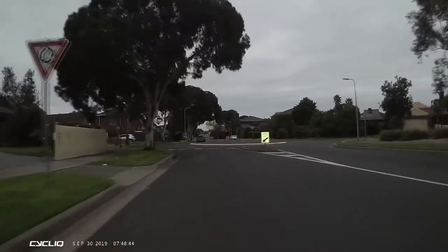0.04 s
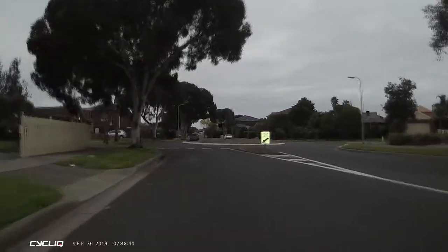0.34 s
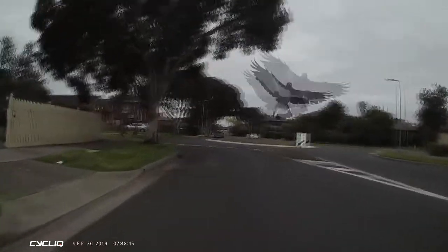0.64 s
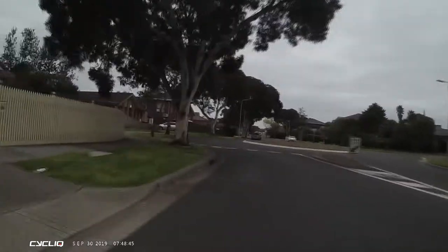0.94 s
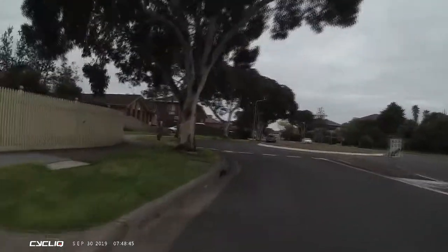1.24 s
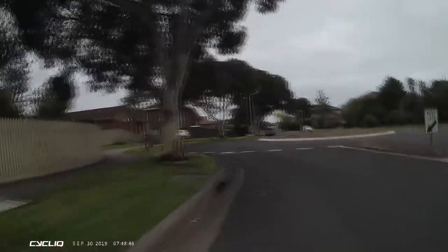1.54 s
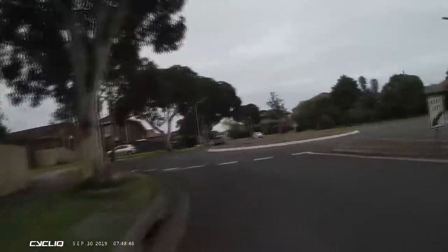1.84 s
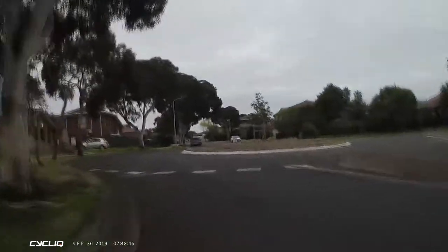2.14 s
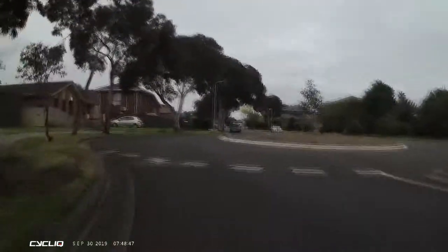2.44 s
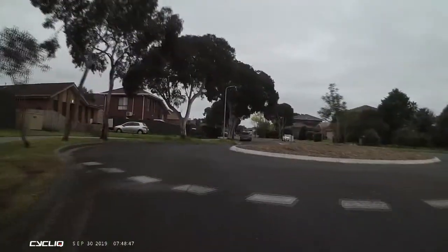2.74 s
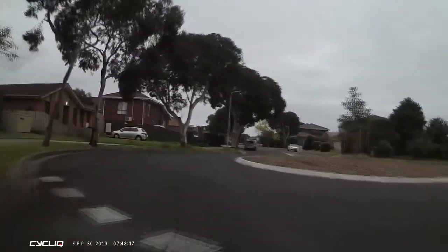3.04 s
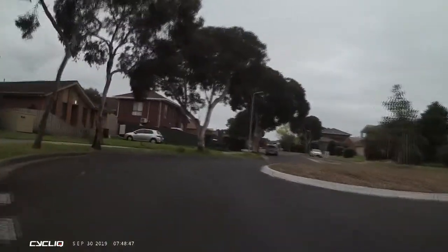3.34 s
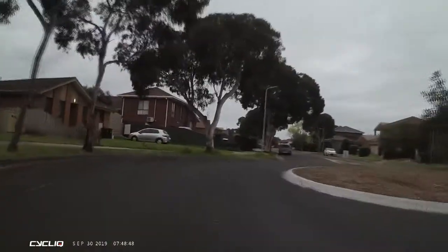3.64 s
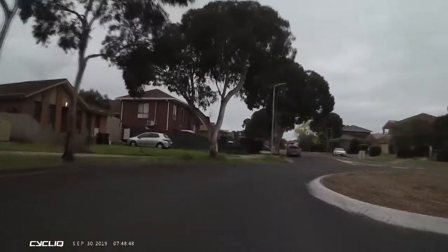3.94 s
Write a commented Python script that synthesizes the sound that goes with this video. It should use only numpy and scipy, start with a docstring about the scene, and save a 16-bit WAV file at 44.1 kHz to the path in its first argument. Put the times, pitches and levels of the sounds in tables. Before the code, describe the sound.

A bicycle rattles along a suburban street, heard close from the handlebar over wind and tyre rumble. Sharp clicks and thumps come in clusters, strongest near the end, while birds screech and whistle faintly in the trees.

```python
"""A suburban street leading into a roundabout, from a camera microphone on a rolling bicycle's handlebar.
Close up, wind and tyres rumble and the rough road keeps the mount chattering; each bump thumps the frame,
clicks the camera case and faintly rings the bell. There are brief gritty scrapes and a thin high whine.
Farther off, birds screech, rasp and whistle in the trees, with a short echo from the street."""
import sys
import numpy as np
from scipy import signal
from scipy.fft import rfft, irfft, next_fast_len
from scipy.io import wavfile
from scipy.ndimage import uniform_filter1d, map_coordinates

SR = 44100
rng = np.random.default_rng(int(sys.argv[2]) if len(sys.argv) > 2 else 0)


def digitize_waveform(pressure):
    """Quantize a signal to 16-bit integers and store it at the path in sys.argv[1].

    Rows of a 2-D input are taken as channels; values are limited to [-1, 1].
    """
    field = np.atleast_2d(pressure).T
    bounded = np.clip(field, -1, 1)
    quanta = np.round(bounded * 32767).astype(np.int16)
    wavfile.write(sys.argv[1], SR, quanta)


N = 176400

# jolts from the road: t/s, peak of the case's click/dB, relative peak of the frame's thump/dB
BUMPS = [(0.03, -37, -24), (0.638, -38, -29), (0.1954, -25, -41), (0.6792, -31, -43), (0.8247, -32, -40),
         (1.708, -22, -25), (1.7294, -22, -24), (1.7463, -9.5, -24), (1.7701, -30, -21), (1.713, -34, -24),
         (1.8812, -30, -21), (1.9018, -25, -27), (1.9059, -13, -22), (1.9269, -16, -30), (1.9618, -21, -29),
         (2.1392, -32, -23), (2.096, -34, -27), (2.1614, -19, -23), (2.2033, -15, -20), (2.2349, -25, -20),
         (2.238, -23, -21), (2.258, -22, -29), (2.2785, -22, -17), (2.284, -6.5, -13.5), (2.3017, -25, -25),
         (2.4463, -25, -41), (2.6037, -30, -31), (2.6463, -25, -32), (2.7138, -29, -29), (2.7307, -28, -24),
         (2.8245, -28, -42), (2.8935, -32, -27), (3.0671, -30, -22), (3.1043, -24, -37), (3.1322, -24, -24),
         (3.1667, -7.5, -23), (3.2911, -28, -18), (3.3053, -16, -16), (3.3438, -18, -20),
         (3.3593, -12, -12), (3.3798, -16, -23), (3.3988, -5, -14), (3.4067, -19, -22), (3.4274, -15, -20),
         (3.493, -15, -22), (3.5075, -17, -25), (3.514, -4, -14), (3.5233, -12, -19), (3.5311, -19, -17),
         (3.5365, -7, -22), (3.5382, 4.5, -10), (3.543, -19, -26), (3.5725, -18, -24), (3.5971, -16, -25),
         (3.6435, -16, -19), (3.8639, -18, -22), (3.9106, -19, -25)]


def amp(db):
    """Decibels to gain."""
    return 10 ** (np.asarray(db) / 20)


def unit(x):
    """Scale to rms 1."""
    return x / np.sqrt(np.mean(x ** 2) + 1e-20)


def seconds(length):
    """A time axis."""
    return np.arange(int(length * SR)) / SR


def add(track, s, sound):
    """Mix a sound in at time s."""
    part = track[max(round(s * SR), 0):][:len(sound)]
    part += sound[:len(part)]


def wobble(rate):
    """A smooth random curve, rate knots a second."""
    return map_coordinates(rng.standard_normal(int(N * rate / SR) + 4), [np.arange(N) * rate / SR])


def tremble(count, size):
    """Noise smoothed over size samples, at rms 1."""
    return unit(uniform_filter1d(rng.standard_normal(count), size))


def response(points, size=8192):
    """Causal impulse response with the colour given as f/Hz, level/dB."""
    hz, db = np.transpose(points)
    grid = np.fft.rfftfreq(size, 1 / SR)
    cepstrum = irfft(np.log(amp(np.interp(np.log(grid + 1), np.log(hz + 1), db))))
    cepstrum[1:size // 2] *= 2
    cepstrum[size // 2 + 1:] = 0
    return irfft(np.exp(rfft(cepstrum)))


def coloured(x, points):
    """x through a colour, at rms 1."""
    return unit(signal.fftconvolve(x, response(points))[:len(x)])


def noise(points):
    """Steady coloured noise at rms 1."""
    return coloured(rng.standard_normal(N + SR), points)[SR:]


def grains(rate, spread_db):
    """Random tiny impacts, rate a second."""
    hits = (rng.random(N) < rate / SR) * rng.choice([-1, 1], N)
    return hits * amp(spread_db * np.clip(rng.standard_normal(N), -2, 2))


def note(hz, partials, rough):
    """A bird's note on a pitch path: swells, fades and trembles."""
    phase = 2 * np.pi * np.cumsum(hz * (1 + rough * tremble(len(hz), size=40))) / SR
    tone = sum(amp(db) * np.sin(round(k) * phase) for k, db in partials)
    return signal.windows.tukey(len(hz), .5) * tone


def rolling(shake_db=2.5, flutter_db=3.0):
    """Rough asphalt shakes the frame and keeps the mount buzzing and ticking right at the microphone."""
    # roughness along the ride: t/s, relative chatter level/dB, relative rumble level/dB
    ride = [(0.0, -52.5, -42.5), (0.57, -54, -42.5), (0.82, -52.5, -42.5), (0.99, -54.5, -44.5),
            (1.17, -55, -42.5), (1.57, -54, -44), (1.78, -47, -40.5), (1.95, -57, -43.5),
            (2.14, -49.5, -41), (2.31, -47.5, -40), (2.83, -54.5, -39.5), (3.06, -49, -43),
            (3.25, -48.5, -38.5), (3.46, -48.5, -36.5), (3.68, -51, -38.5), (4.0, -50, -39)]
    # tyres heard through the frame: f/Hz, level/dB
    road_colour = [(65, -16.5), (110, 1.5), (182, -2), (252, 0.5), (291, -4.5), (400, -9.5), (561, -16),
                   (888, -22.5), (969, -13), (1030, -25), (1140, -18), (1500, -28.5), (1950, -75),
                   (3300, -120)]
    # resonances of the mount: f/Hz, level/dB
    mount_colour = [(1000, -36), (2800, -9.5), (4200, -11), (5200, 3.5), (6000, -3), (6900, -3),
                    (7900, -13), (9500, -24), (12500, -17), (15500, -33)]
    s, chatter_db, road_db = np.transpose(ride)
    t = np.arange(N) / SR
    shaking_db = shake_db * wobble(35)
    rumble = amp(np.interp(t, s, road_db) + 1 + shaking_db) * noise(road_colour)
    bursts = rng.standard_normal(N) * amp(shaking_db + flutter_db * np.tanh(wobble(130)))
    ticks = rng.standard_normal(N) * uniform_filter1d(grains(rate=120, spread_db=5), size=70)
    chatter = coloured(bursts, mount_colour) + amp(0.5) * coloured(ticks, mount_colour)
    return rumble + amp(np.interp(t, s, chatter_db) - 1) * chatter


def wind(wind_db=-44.5, gust_db=2.5, hiss_db=-57):
    """Air buffets the microphone over the even hiss of the street."""
    # buffeting: f/Hz, level/dB
    wind_colour = [(10, -41), (20, -25), (35, 0.5), (60, 2), (95, 8.5), (140, -26), (300, -26), (900, -62),
                   (2000, -120)]
    # street hiss: f/Hz, level/dB
    hiss_colour = [(400, -19), (980, -3), (1250, 3.5), (1800, -2), (3000, 0), (4200, -6), (6500, -24),
                   (9000, -14), (12500, -14.5), (14300, -18), (15800, -44)]
    return amp(wind_db + gust_db * wobble(14)) * noise(wind_colour) + amp(hiss_db) * noise(hiss_colour)


def whine(hz=13300, level_db=-75, waver_db=8, rise_db_per_s=2.0):
    """A thin high whine flickers and slowly grows."""
    t = np.arange(N) / SR
    level = amp(waver_db * np.tanh(wobble(5.7) + wobble(40)) + rise_db_per_s * t)
    return amp(level_db) * unit(level * np.sin(2 * np.pi * hz * t + wobble(300)))


def bell(hz=2384, t60_s=2.2, level_db=-68):
    """The bicycle's bell hums faintly throughout, fed by the jolts."""
    t = np.arange(N) / SR
    energy = sum(amp(db) ** 2 * (t > s) * amp(-60 * np.abs(t - s) / t60_s) ** 2 for s, _, db in BUMPS)
    return amp(level_db) * unit(np.sqrt(energy + 0.012) * np.sin(2 * np.pi * hz * t))


def frame_thump(t, detune=.1, rise_s=0.0019):
    """The jolted frame rings for a few low cycles, tuned a little differently each time; peak 1."""
    # modes of the frame: f/Hz, level/dB, T60/s
    modes = [(65.3, -20.5, 0.2), (144.3, -9.5, 0.047), (226, -3, 0.044), (292.2, 1, 0.029),
             (405, -6, 0.031), (596, -14.5, 0.023), (1116, -25, 0.019)]
    ring = sum(amp(db - 60 * t / t60) * np.sin(2 * np.pi * hz * np.exp(detune * rng.normal()) * t)
               for hz, db, t60 in modes)
    thump = ring * (1 - np.exp(-(t / rise_s) ** 2))
    return thump / np.abs(thump).max()


def bumps(contact_s=0.00069, loosen_s=0.0013, settle_s=0.0033, stray_s=0.01114):
    """Each jolt thumps the frame and clicks the camera case amid a lumpy buzz and small stray ticks just before
    and after."""
    # resonances of the case: f/Hz, level/dB
    case_colour = [(400, -36.5), (1100, -15.5), (1400, -29.5), (1900, -12.5), (2800, -20), (3700, -9.5),
                   (4500, -5.5), (5200, 3), (6300, 0.5), (7000, -3.5), (7700, -16), (9000, -29.5),
                   (13000, -38.5), (16000, -64)]
    out, t, case = np.zeros(N), seconds(0.09), response(case_colour)
    lead_s = .02  # room for the buzz to build before the blow
    since = t - lead_s
    touch = lambda at: np.exp(-((since - at) / contact_s) ** 2)
    buzz = np.exp(np.minimum(since / loosen_s, -since / settle_s))
    for s, click_db, thump_db in BUMPS:
        stray_ticks = sum(touch(side * stray_s * rng.uniform(0.13, 1)) for side in (-1, 1, 1))
        lumps = amp(5 * np.tanh(tremble(len(t), size=130)))
        clatter = amp(-18) * buzz * lumps + amp(-23) * stray_ticks
        contact = touch(0) + amp(-0.43 * click_db) * clatter  # softer clicks hold more clatter
        click = signal.fftconvolve(rng.choice([-1, 1], len(t)) * contact, case)[:len(t)]
        add(out, s - lead_s - .0002, amp(click_db) * click / np.abs(click).max())
        add(out, s - 0.00257, amp(thump_db - 0.5) * frame_thump(t))
    return out


def screeches(rise_s=.046, yelp_after_s=.031, yelp_s=0.045, yelp_t60_s=0.08, sag_hz_per_s=4240):
    """A bird's rough, two-voiced screech rises and breaks into a louder, falling yelp."""
    # screeches: t/s, base level/dB, gain of the fundamental/dB, yelp's starting f/Hz
    calls = [(.222, -45, -18, 5150), (.843, -41.5, -15, 5220), (1.628, -39.5, -11.5, 5070),
             (2.34, -48, -13, 5160), (3.209, -36, -4.5, 4800)]
    # two voices at once: pitch ratio, gain/dB
    voices = [(0.99, -1.5), (.91, -11)]
    # overtones of each voice: harmonic number, gain/dB
    overtones = [(2, -3), (3, -20), (4, -29)]
    out, t = np.zeros(N), seconds(yelp_s)
    sweep = 2650 + 1030 * np.sin(np.pi / 2 * seconds(rise_s) / rise_s)
    for s, db, fundamental_db, yelp_hz in calls:
        for ratio, voice_db in voices:
            voice = note(ratio * sweep, [(1, fundamental_db), *overtones], rough=.045)
            add(out, s, amp(db + voice_db) * voice)
        yelp = note(yelp_hz - sag_hz_per_s * t, [(1, 0)], rough=.022)
        add(out, s + yelp_after_s, amp(db + 11.5 - 60 * t / yelp_t60_s) * yelp)
    return out


def scrapes(flicker_db=9.4):
    """Brief bright scrapes, as of grit under a tyre."""
    # scrapes: t/s, length/s, level/dB
    patches = [(0.665, 0.14, -47.5), (2.616, 0.051, -43.5), (2.655, 0.12, -47), (3.214, 0.068, -44.5)]
    # grit: f/Hz, level/dB
    grit_colour = [(1000, -13), (2400, -5.5), (3600, -2.5), (6500, -1), (9000, -12.5), (13500, -14),
                   (16000, -29)]
    grit = coloured(rng.standard_normal(N) * amp(flicker_db * np.tanh(wobble(140))), grit_colour)
    envelope = np.zeros(N)
    for s, length, db in patches:
        add(envelope, s, amp(db) * signal.windows.tukey(len(seconds(length)), .9))
    return envelope * grit


def rasp(start_s=1.345, rise_s=0.042, level_db=-45):
    """One low, toneless bird call swells quickly and dies away."""
    # the hoarse voice: f/Hz, level/dB
    rasp_colour = [(1300, -19), (1550, 1.5), (1800, -13), (2080, -4), (2350, -30), (3500, -18), (5000, -42),
                   (9000, -68)]
    out, t = np.zeros(N), seconds(.5)
    swell = (t / rise_s * np.exp(1 - t / rise_s)) ** 2
    add(out, start_s, amp(level_db) * swell * coloured(rng.standard_normal(len(t)), rasp_colour))
    return out


def whistles(end_drop=0.17):
    """Two bird whistles arch up and down in pitch, sounding only their upper harmonics."""
    # whistles: t/s, length/s, fundamental at the top f/Hz, base level/dB, gain of harmonic 4/dB
    calls = [(3.595, .2, 1140, -51.5, -1), (3.913, .135, 1173, -56, 9)]
    # higher partials: harmonic number, gain/dB
    overtones = [(5, 4), (7, -10)]
    out = np.zeros(N)
    for s, length, top_hz, db, fourth_db in calls:
        position = 2 * seconds(length) / length - 1
        arch_hz = top_hz * (1 - end_drop * position ** 2)
        add(out, s, amp(db) * note(arch_hz, [(4, fourth_db), *overtones], rough=0.0086))
    return out


def with_street_echo(sound, t60_s=0.17, echo_db=-11):
    """The street adds a short diffuse tail to a distant sound."""
    t = seconds(.5)
    tail = rng.standard_normal(len(t)) * amp(-60 * t / t60_s)
    return sound + amp(echo_db) * signal.fftconvolve(sound, tail / np.linalg.norm(tail))[:N]


def scene():
    """One handlebar microphone: the bicycle close and dry, the birds off in the trees."""
    close = rolling() + wind() + bumps() + scrapes() + bell() + whine()
    birds = with_street_echo(screeches() + whistles() + rasp())
    return (close + birds)[None]


def record(dry, top_hz=16000):
    """The camera overloads at full scale and falls off steeply at its band limit."""
    size = next_fast_len(N + SR // 2)
    low_pass = 1 / (1 + (np.fft.rfftfreq(size, 1 / SR) / top_hz) ** 60)
    return irfft(rfft(np.clip(dry, -1, 1), size) * low_pass, size)[..., :N]


dry = scene()
out = record(dry)
digitize_waveform(out)
```